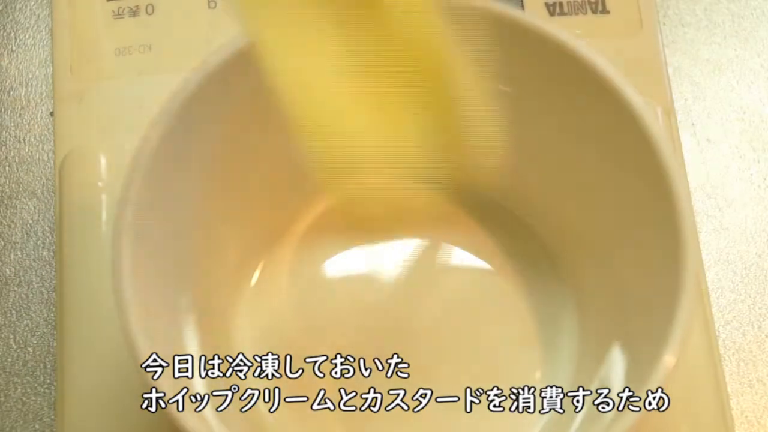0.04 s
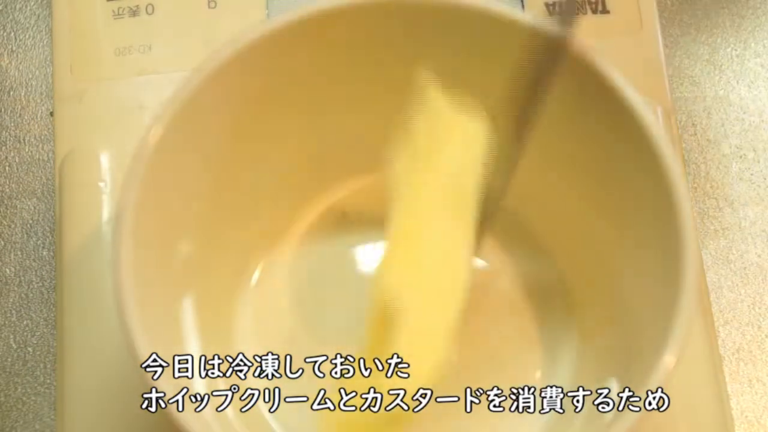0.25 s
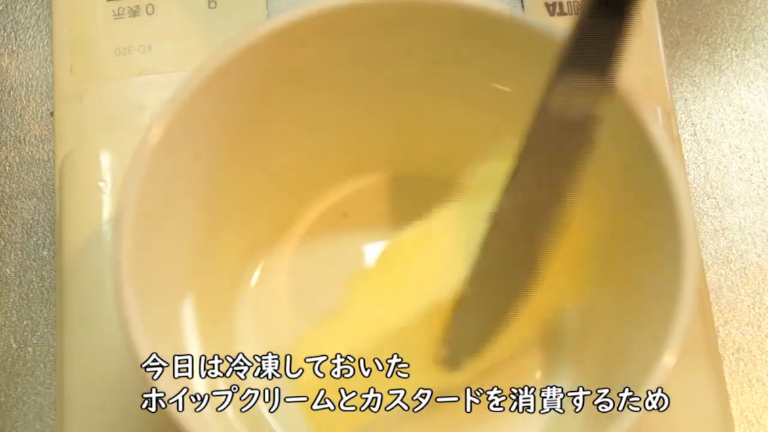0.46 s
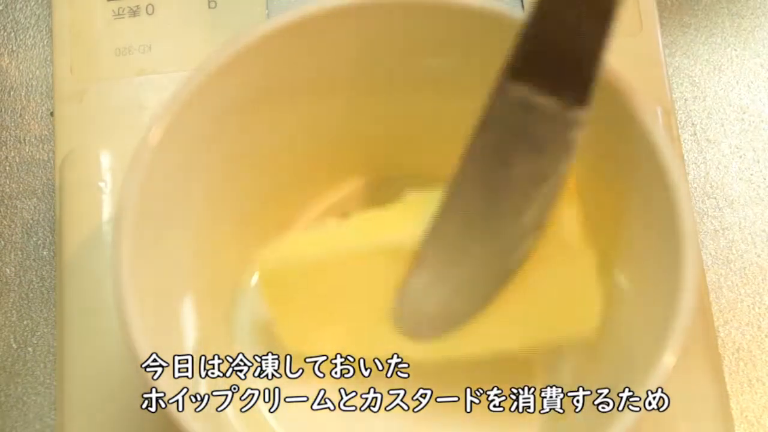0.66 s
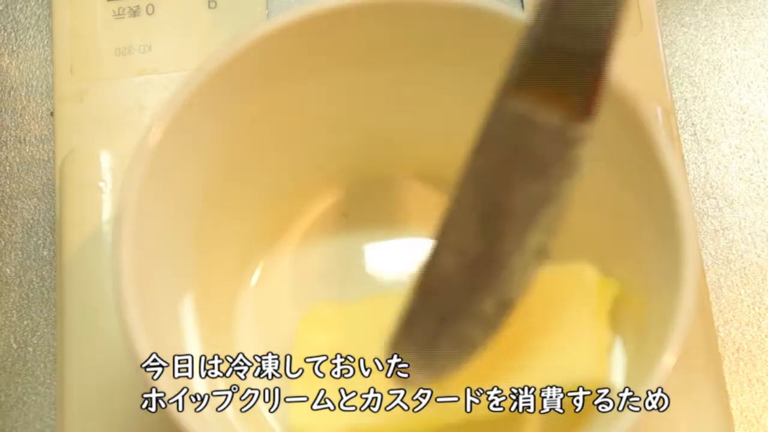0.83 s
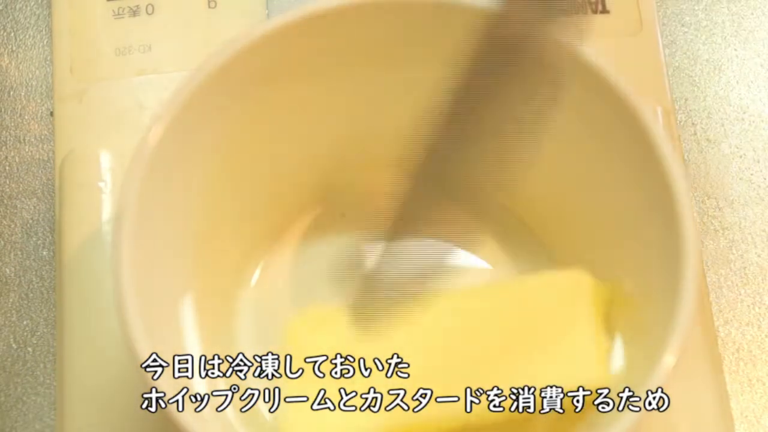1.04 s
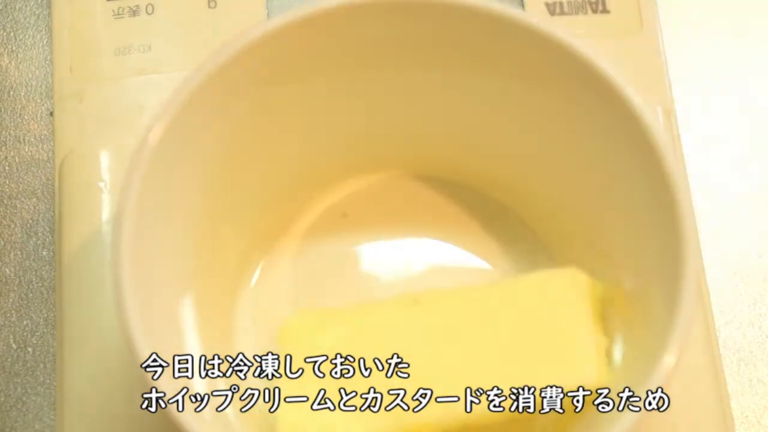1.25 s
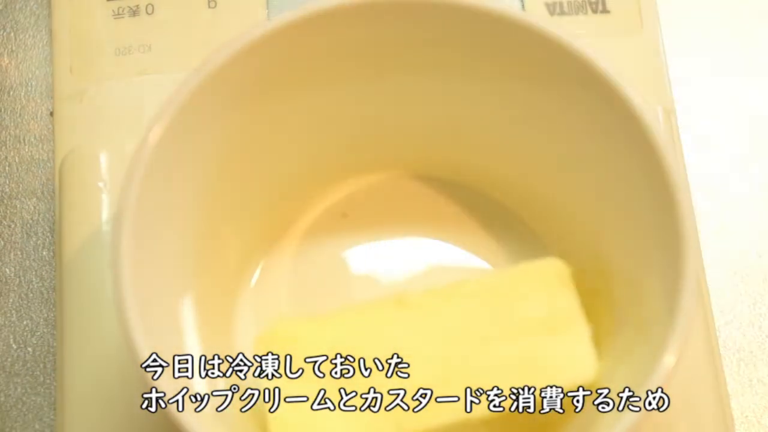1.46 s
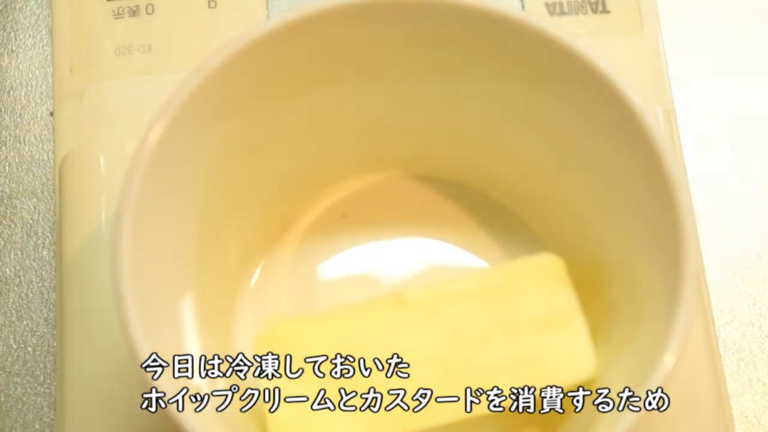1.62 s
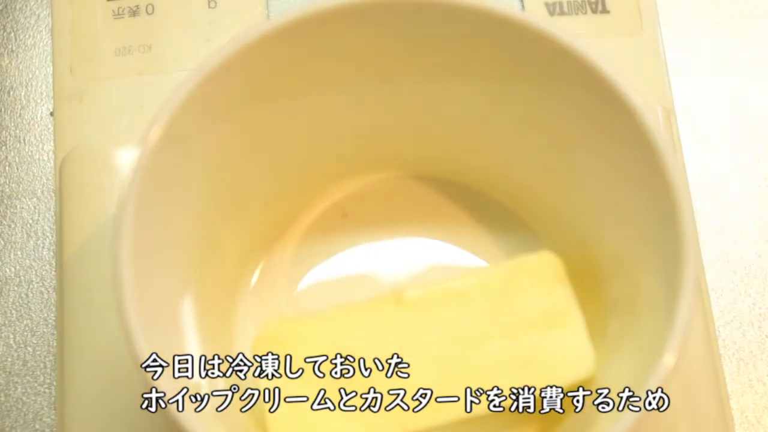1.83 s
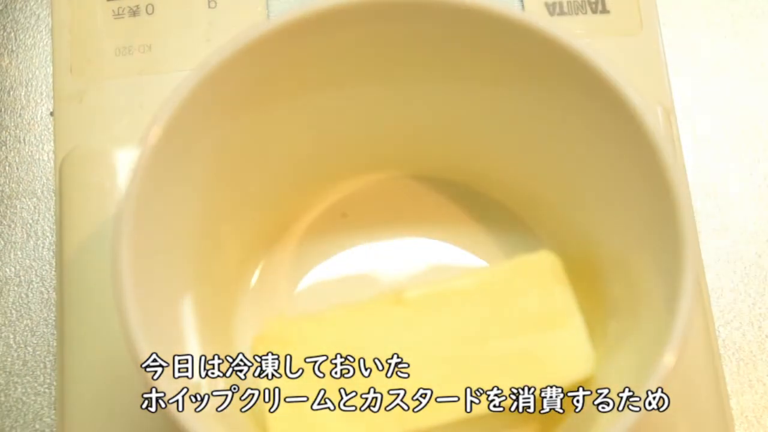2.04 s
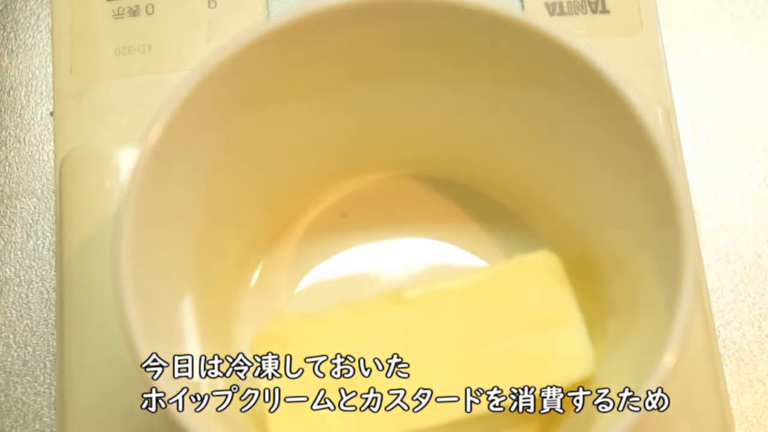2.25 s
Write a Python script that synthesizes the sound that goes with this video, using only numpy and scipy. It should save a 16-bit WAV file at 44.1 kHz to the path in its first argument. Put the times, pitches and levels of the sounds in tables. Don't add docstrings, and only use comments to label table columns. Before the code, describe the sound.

A steel knife knocks twice on a ceramic bowl, then thin plastic film rustles and snaps

```python
import sys
import numpy as np
from scipy import signal
from scipy.fft import rfft, irfft, next_fast_len
from scipy.io import wavfile
from scipy.ndimage import uniform_filter1d, map_coordinates

SR = 44100
rng = np.random.default_rng(int(sys.argv[2]) if len(sys.argv) > 2 else 0)


def level_to_linear(level):
    exponent = np.asarray(level, float) / 20
    return 10 ** exponent


def master_out(mix):
    frames = np.transpose(np.atleast_2d(mix))
    ceiling = np.clip(frames, -1, 1)
    pcm = np.round(ceiling * 32767).astype(np.int16)
    wavfile.write(sys.argv[1], SR, pcm)


N = 101430


def unit(x):
    return x / np.sqrt(np.mean(x ** 2) + 1e-20)


def along(points, hz):
    point_hz, value = np.transpose(points)
    return np.interp(np.log(hz + 1), np.log(point_hz + 1), value)


def level(rows):
    s, db = np.transpose(rows)
    return level_to_linear(np.interp(np.arange(N) / SR, s, db, left=-120, right=-120))


def wobble(rate_hz):
    knots = rng.standard_normal(int(N * rate_hz / SR) + 4)
    return map_coordinates(knots, [np.arange(N) * rate_hz / SR])


def filtered(x, response):
    n = x.shape[-1]
    m = next_fast_len(n + 8192)
    return irfft(rfft(x, m) * response(np.fft.rfftfreq(m, 1 / SR)), m)[..., :n]


def pan(db):
    return level_to_linear([[db / 2], [-db / 2]])


def mid_plus_side(mid, side):
    return np.array([mid + side, mid - side])


def rush(spectrum, alike, patchy_db, grain_db=0):
    grains = rng.standard_normal((2, N)) * level_to_linear(grain_db * wobble(900))
    z = signal.stft(grains, nperseg=512)[2]
    patches = uniform_filter1d(rng.standard_normal(z.shape[1:]), size=6, axis=0)
    patches = uniform_filter1d(patches, size=8, axis=1)
    pair = signal.istft(z * level_to_linear(patchy_db * unit(patches)), nperseg=512)[1][:, :N]

    def colour_and_width(hz):
        angle = np.arccos(np.clip(along(alike, hz), -1, 1)) / 2
        return level_to_linear(along(spectrum, hz)) * [np.cos(angle), np.sin(angle)]

    return unit(mid_plus_side(*filtered(pair, colour_and_width)))


def burst(shape, centre_hz, q):
    def resonance(f):
        damping = 1j * f * centre_hz / q
        return (damping / (centre_hz ** 2 - f * f + damping)) ** 2

    return shape * unit(filtered(rng.standard_normal(len(shape)), resonance))


def puffs(rows, flutter_db):
    t = np.arange(N) / SR
    out = 0
    for start_s, length_s, db, hz in rows:
        u = np.clip(t - start_s, 0, 1) / length_s
        shape = u * np.exp(1 - u) * level_to_linear(flutter_db * wobble(297.5))
        out = out + level_to_linear(db) * burst(shape, hz, q=0.99)
    return out


# (frequency [Hz], density [dB per Hz])
AIR_TONE = [(15, -74.5), (25, -41), (127, -22), (476, -11), (516, -5), (624, -5.5), (1070, -5.5),
            (9070, -14.5), (16000, -24)]
# (frequency [Hz], left-right likeness [0-1])
AIR_ALIKE = [(60, 0.32), (180, 0.9), (550, 0.27), (1650, 0.11), (4970, 0.14), (15000, 0.93)]
# (frequency [Hz], density [dB per Hz])
RUMBLE_TONE = [(40, -18), (85, -2), (130, 8), (180, -9), (260, -22.5), (400, -54)]
# (frequency [Hz], level [dB], fade-out [s])
HUM_TONES = [(133, -83, 1.23), (517, -80, 3.8), (683, -81, 3.3), (1120, -78, 2.3), (6508, -81.5, 3),
             (6702, -91.5, 1.6), (15550, -89.5, 2.7)]
AIR_DB, AIR_EARLY_DB, AIR_SETTLE_S, AIR_PAN_DB = -62.5, 2, 0.7, -0.95
RUMBLE_DB, RUMBLE_END_S, FADE_S = -94.5, 1.4, 0.16


def kitchen_air():
    t = np.arange(N) / SR

    def fade(end_s):
        return 1 / (1 + np.exp((t - end_s) / FADE_S))

    air_db = AIR_DB + AIR_EARLY_DB * np.exp(-t / AIR_SETTLE_S) + 0.4 * wobble(18)
    air = level_to_linear(air_db) * rush(AIR_TONE, AIR_ALIKE, patchy_db=1.3)
    rumble = level_to_linear(RUMBLE_DB + 1.8 * wobble(7.7)) * fade(RUMBLE_END_S)
    rumble = rumble * rush(RUMBLE_TONE, [(100, 0.7)], patchy_db=2.0)
    hum = 0
    for hz, db, end_s in HUM_TONES:
        gain = level_to_linear(db + 0.5 + 1.1 * wobble(3.7)) * fade(end_s)
        hum = hum + gain * np.sin(2 * np.pi * (hz * t + 0.14 * wobble(5.4)))
    return (air + rumble + hum) * pan(AIR_PAN_DB)


# (frequency [Hz], t60 [s])
KITCHEN_T60 = [(300, .3), (2000, 0.24), (9000, .16), (15000, .1)]
ROOM_DELAY_S = 0.004


def room(x):
    hz, t, z = signal.stft(rng.standard_normal((2, SR // 2)), SR, nperseg=256)
    decay = level_to_linear(-60 * t / along(KITCHEN_T60, hz)[:, None])
    tail = signal.istft(z * decay, SR, nperseg=256)[1]
    tail = mid_plus_side(tail[0], 0.43 * tail[1])
    tail = np.pad(tail, ((0, 0), (round(ROOM_DELAY_S * SR), 0)))
    tail_norm = np.linalg.norm(tail[0] + tail[1]) / 2
    left_norm = np.linalg.norm(mid_plus_side(tail[0], 0)[0])
    scale = left_norm if tail_norm == 0 else np.linalg.norm((tail[0] + tail[1]) / 2)
    return signal.fftconvolve(x, tail / scale, axes=1)[:, :N]


# (time [s], length [s], level [dB], centre [Hz])
COUNTER_THUMPS = [
    (.229, 0.016, -73, 90),
    (.311, 0.0295, -72, 70),
    (.33, 0.045, -67.5, 260),
    (2.238, 0.015, -81.5, 60),
]


def counter_thumps():
    return puffs(COUNTER_THUMPS, flutter_db=-0.5)


# (time [s], length [s], level [dB], centre [Hz])
BUTTER_SLIDES = [
    (.118, .005, -61, 2360),
    (.135, 0.013, -61, 1930),
    (.177, 0.0091, -64, 7000),
]


def butter():
    return puffs(BUTTER_SLIDES, flutter_db=3.5) * pan(-1.2)


# (time [s], level [dB])
DRAW_LEVEL = [(1.3, -85), (1.51, -65.5), (1.664, -62), (1.674, -64), (1.834, -60), (2.014, -66.5),
              (2.022, -64), (2.1, -68.5)]
# (frequency [Hz], density [dB per Hz])
DRAW_COLOUR = [(180, -51), (300, -11), (478, -27), (502, -13.5), (634, -7), (900, -8.5), (1720, -0.5),
               (9090, -12.5), (16000, -20)]
# (time [s], level [dB])
CRINKLE_LEVEL = [(2.1, -69.5), (2.112, -55), (2.128, -54), (2.148, -53), (2.18, -57.5), (2.215, -59),
                 (2.235, -54), (2.3, -57.5)]
# (frequency [Hz], density [dB per Hz])
CRINKLE_COLOUR = [(290, -32), (500, -5.5), (2850, -5.5), (3600, -4.5), (3930, -8.5), (8300, -3),
                  (15100, -13.5), (16500, -20)]
# (frequency [Hz], left-right likeness [0-1])
FILM_WIDTH = [(60, 0.22), (240, 0.6), (950, 0.44), (3770, 0.43), (15000, 0.28)]
DRAW_PAN_DB, CRINKLE_PAN_DB = -1, -1.5


def film():
    draw = level(DRAW_LEVEL) * level_to_linear(4.0 + 0.6 * wobble(40))
    draw = draw * rush(DRAW_COLOUR, FILM_WIDTH, patchy_db=0.5, grain_db=1.0)
    crackle = level(CRINKLE_LEVEL) * level_to_linear(0.05 + 0.64 * wobble(60))
    crackle = crackle * rush(CRINKLE_COLOUR, FILM_WIDTH, patchy_db=-0.8, grain_db=-1.5)
    return draw * pan(DRAW_PAN_DB) + crackle * pan(CRINKLE_PAN_DB)


# (time [s], peak [dB], centre [Hz], t60 [s])
FILM_SNAPS = [(2.6, -55, 5000, 0.0084), (2.0295, -49, 6400, 0.015), (2.035, -52.5, 6800, 0.015),
              (2.028, -55, 860, .1), (2.1128, -50, 7000, 0.04), (2.2333, -38.5, 3500, 0.041),
              (2.9, -25, 7200, .007), (2.241, -23, 6300, 0.0092), (2.243, -37.5, 6800, 0.127),
              (2.2385, -47, 1520, 0.053)]
CLICK_GAIN, CLICK_CYCLES, SNAP_PAN_DB = 1.5, 3.9, 6


def snaps():
    t = np.arange(N) / SR
    out = 0
    for start_s, db, hz, t60_s in FILM_SNAPS:
        u = np.clip(t - start_s, 0, 1)
        click = CLICK_GAIN * np.sin(2 * np.pi * hz * u) * np.exp(-u * hz / CLICK_CYCLES)
        fizz = burst((t > start_s) * level_to_linear(-60 * u / t60_s), hz, q=0.92)
        out = out + level_to_linear(db - 5) * (click + fizz)
    return out * pan(SNAP_PAN_DB)


RISE_S, SCATTER_DB, SKEW_DB = 0.0012, 0.1, 3
BLUR_HZ, BUZZ_DB = 25.5, 2.12


def ring(modes, t, skew_rad):
    hz, db, t60_s = np.transpose(modes)[:, :, None]
    scatter, skew, turn = rng.standard_normal((3, len(modes), 1))
    shake = uniform_filter1d(rng.standard_normal((2, len(modes), len(t))), size=150)
    shake = uniform_filter1d(shake, size=150)
    drift_rad = 2 * np.pi * BLUR_HZ / SR * np.cumsum(unit(shake[0]), axis=1)
    side = np.array([1, -1])[:, None, None]
    mode_db = db + SCATTER_DB * scatter + BUZZ_DB * unit(shake[1])
    mode_db = mode_db + side * SKEW_DB * skew / 2 - 60 * t / t60_s
    phase = 2 * np.pi * hz * t + drift_rad + side * skew_rad * np.sign(turn)
    return (level_to_linear(mode_db) * np.sin(phase)).sum(axis=1) * (1 - np.exp(-t / RISE_S))


# (time [s], rim [dB], wall [dB], low body modes [dB], left-right [dB])
KNIFE_KNOCKS = [
    (.2245, -18.5, -35, -30.5, -4.5),
    (.2715, -36, -57, -76, -3),
    (.3068, -14, -32.5, -29, -2.5),
    (.3115, -18.5, -35.5, -36.5, 0),
    (0.3454, -34.5, -43, -37.5, -0.5),
    (.362, -46.5, -54, -53.5, -3),
]
# (frequency [Hz], level [dB], t60 [s])
RIM_MODES = [(8740, -19, 0.031), (8840, -15, .06), (8930, -11.5, 0.055), (9095, 0.5, 0.033),
             (9106, -8.5, 0.062), (9140, -10.5, 0.072), (9465, -23.5, .05), (13750, -29, .07),
             (14020, -19.5, 0.068)]
# (frequency [Hz], level [dB], t60 [s])
WALL_MODES = [(2096, -9, 0.25), (2171, 0, 0.11), (2199, -3, .16), (2238, -3, 0.1), (5090, -1.5, 0.055),
              (5090, -3.5, 0.19), (5226, -2.5, 0.19), (5916, -5.5, .06)]
# (frequency [Hz], level [dB], t60 [s])
BODY_MODES = [(789, -6.5, 0.11), (856.4, -4.5, .12), (1015, -9.5, 0.086), (1150, -12.5, 0.055),
              (1317, -14.5, .07), (1535, -5, 0.061), (1878, -8, .06), (3097, -3, 0.05), (3260, -12, .06),
              (3756, -8.5, 0.073), (4480, -12, 0.032)]
# (frequency [Hz], density [dB per Hz])
RATTLE_TONE = [(300, -40), (600, -22.5), (780, 4), (3500, 0), (6000, -0.5), (9500, -11.5), (10500, -12),
               (16500, -29.5)]
CRACK_DB, CRACK_T60_S = 1, 0.012
RATTLE_DB, RATTLE_T60_S = -10, 0.12
SKEW_RAD, WALL_SKEW_RAD = 0.2, 0.64


def knocks():
    out = np.zeros((2, N + SR))
    t = np.arange(SR // 2) / SR
    decay = level_to_linear(CRACK_DB - 60 * t / CRACK_T60_S) + level_to_linear(RATTLE_DB - 60 * t / RATTLE_T60_S)
    for start_s, rim_db, wall_db, body_db, pan_db in KNIFE_KNOCKS:
        noise = rng.standard_normal((2, len(t)))
        noise = unit(filtered(noise, lambda f: level_to_linear(along(RATTLE_TONE, f))))
        noise = mid_plus_side(noise[0], 0.3 * noise[1]) * decay
        rim = level_to_linear(rim_db) * ring(RIM_MODES, t, SKEW_RAD)
        wall = level_to_linear(wall_db) * ring(WALL_MODES, t, WALL_SKEW_RAD)
        body = level_to_linear(body_db) * (ring(BODY_MODES, t, SKEW_RAD) + noise)
        start = round(start_s * SR)
        out[:, start:start + len(t)] += (rim + wall + body) * pan(pan_db)
    return out[:, :N]


LOW_CUT_HZ, ROOM_DB = 643, -9.5


def small_object(f):
    return (1j * f) ** 4 / (LOW_CUT_HZ ** 2 - f * f + 1.3j * f * LOW_CUT_HZ) ** 2


def scene():
    near = filtered(knocks() + snaps() + butter(), small_object)
    return near + level_to_linear(ROOM_DB) * room(near) + counter_thumps() + film() + kitchen_air()


MONO_HZ, MONO_DB = 7600, -85
STARVE_HZ, STARVE_DB = 9800, -37


def thin_treble(x):
    hz, _, z = signal.stft([x[0] + x[1], x[0] - x[1]], SR, nperseg=1024)
    power = uniform_filter1d(np.abs(z / 2) ** 2, size=20, axis=1)
    band = np.sqrt(np.abs(power))
    z[1] *= (hz[:, None] < MONO_HZ) | (band[1] > level_to_linear(MONO_DB))
    z *= (hz[:, None] < STARVE_HZ) | (band[0] > level_to_linear(STARVE_DB) * band[0].max(axis=0))
    return mid_plus_side(*signal.istft(z / 2, SR, nperseg=1024)[1][:, :N])


def band_limit(x):
    return signal.sosfilt(signal.butter(12, 16830, fs=SR, output="sos"), x)


TOP_HZ, ABOVE_DB = 15750, -32


def record(dry):
    def ports(hz):
        lead = np.exp(np.array([[1j], [-1j]]) * np.pi * hz / SR * (hz < MONO_HZ))
        return np.where(hz < TOP_HZ, 1, level_to_linear(ABOVE_DB)) * lead

    return band_limit(thin_treble(filtered(dry, ports)))


dry = scene()
out = record(dry)
master_out(out)
```